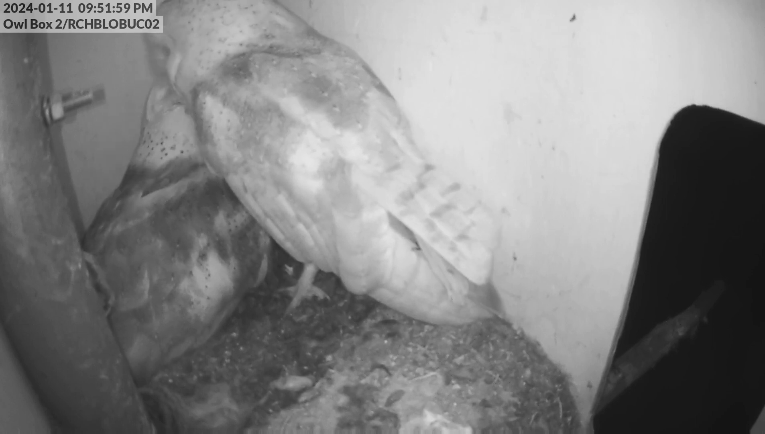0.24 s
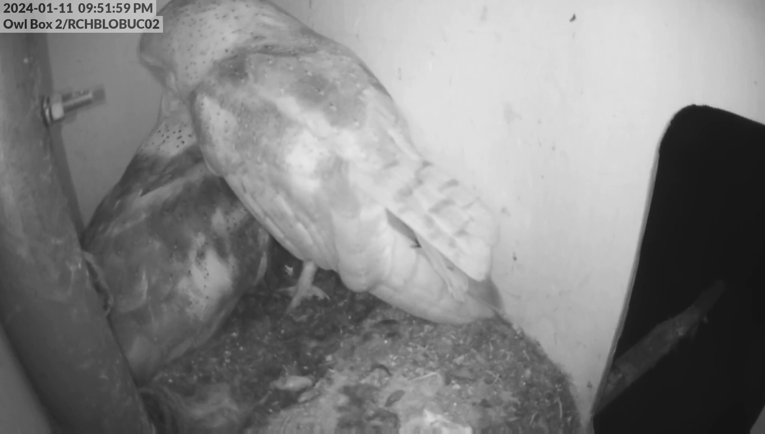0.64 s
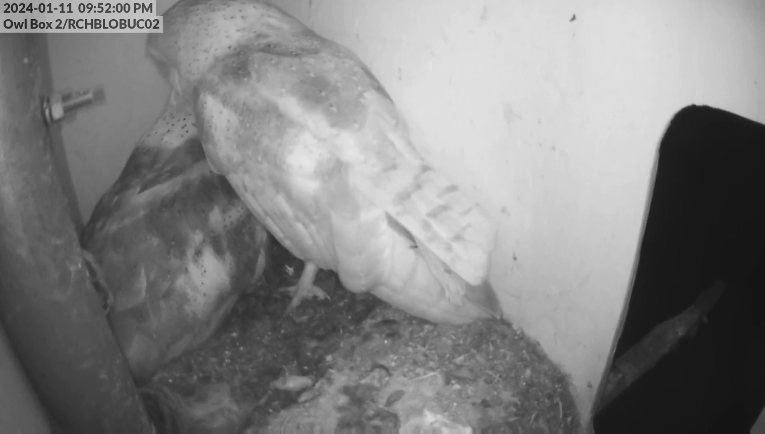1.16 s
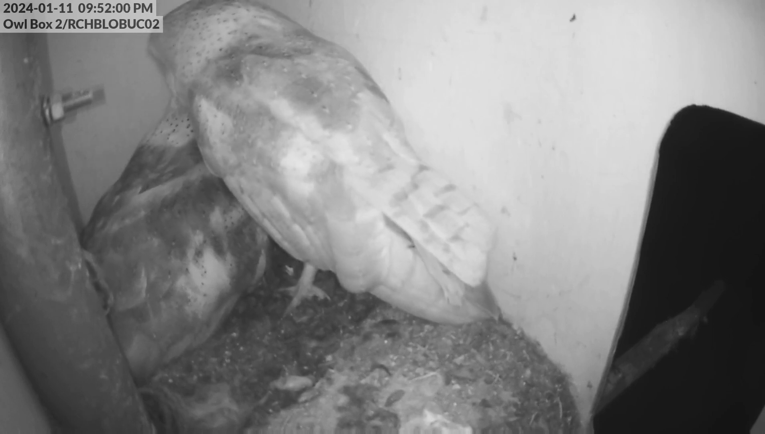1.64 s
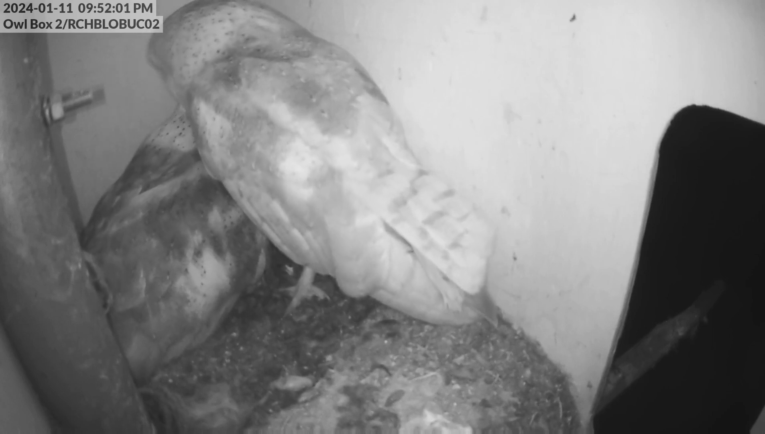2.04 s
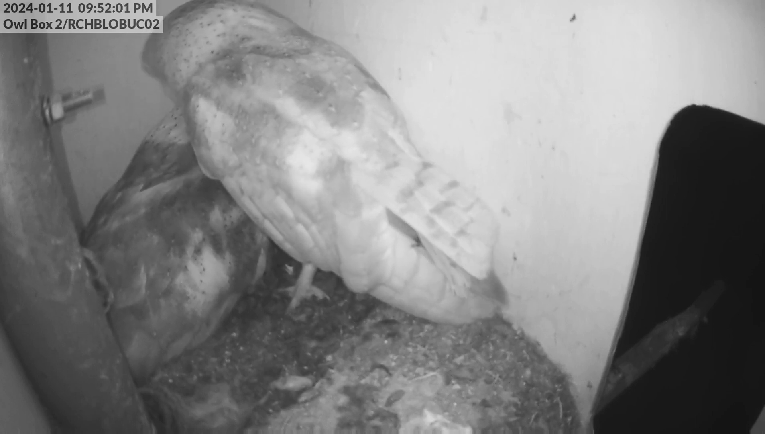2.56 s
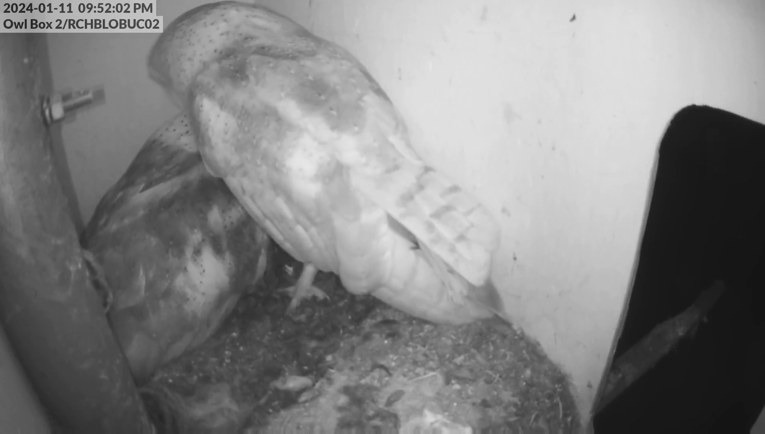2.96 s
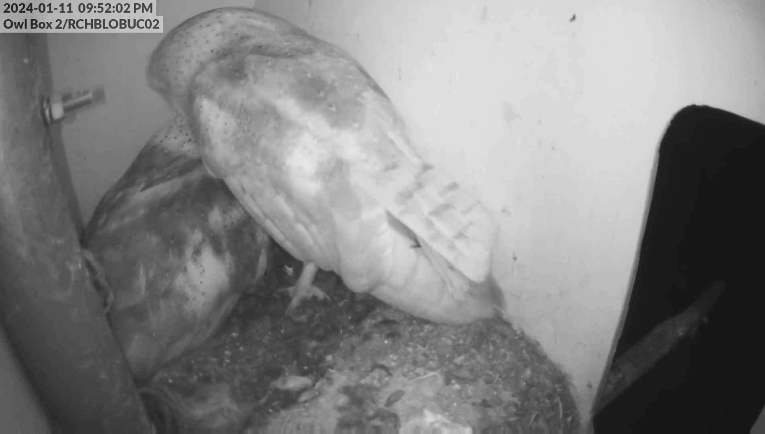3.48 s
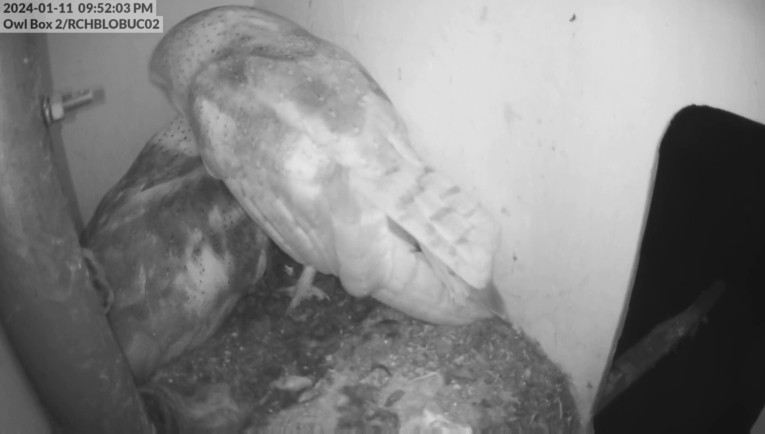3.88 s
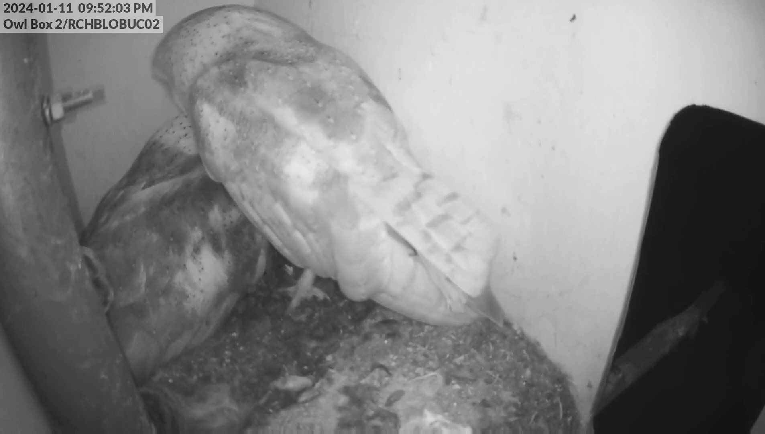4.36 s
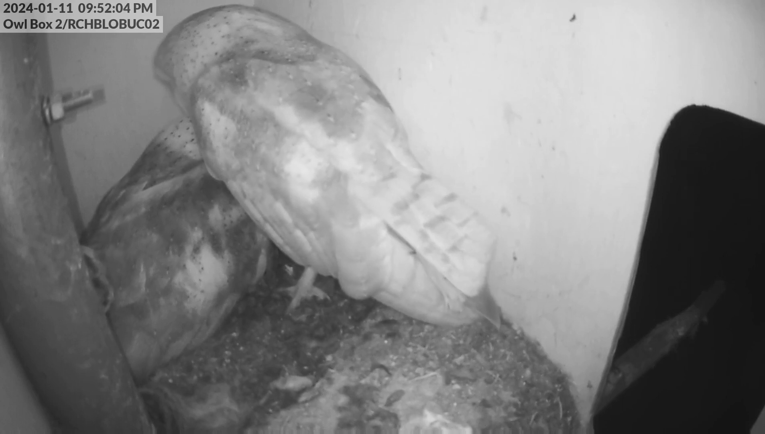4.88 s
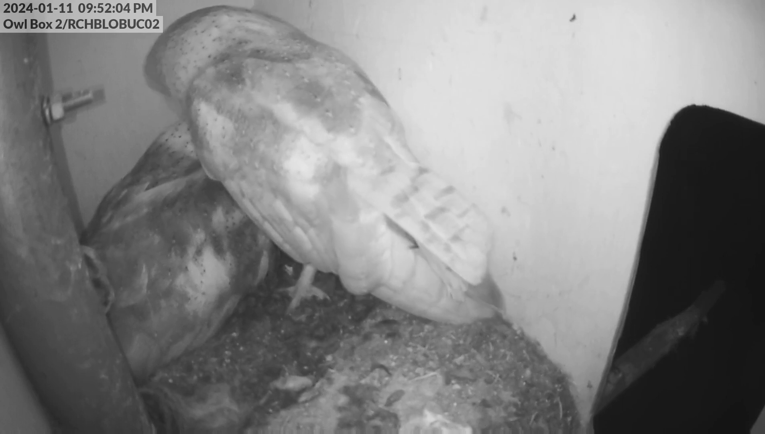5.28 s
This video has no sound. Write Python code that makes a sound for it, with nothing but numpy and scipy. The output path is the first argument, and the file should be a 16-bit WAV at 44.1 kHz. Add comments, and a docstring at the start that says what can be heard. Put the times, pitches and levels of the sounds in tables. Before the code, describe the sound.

Close to the microphone inside a small wooden nest box, a barn owl begs four times at uneven intervals. Each call lasts under half a second: a thin whistle breaks into a rough, rattling hiss and ends in a whistle. Soft dull ticks fall between the calls, and two faint hollow sounds ring far off after the third. A low steady hiss and drone continue throughout.

```python
"""A barn owl begs four times in a wooden nest box, close to the microphone.
Each call opens as a thin whistle, breaks into a rasping hiss with a rattle an octave below, and ends as a whistle.
The whistle is a complex tone roughened by chaos; rattle, low rasp and hiss are noise let through in puffs.
Around the calls: small ticks of noise in the box, two faint far-off sounds made of ringing noise,
and a steady low hiss over a low drone."""
import sys
import numpy as np
from scipy import signal
from scipy.fft import rfft, irfft, next_fast_len
from scipy.io import wavfile
from scipy.ndimage import uniform_filter1d, map_coordinates

SR = 44100
rng = np.random.default_rng(int(sys.argv[2]) if len(sys.argv) > 2 else 0)


def store_wav(level_fs):
    """Save 16-bit WAV to argv[1]."""
    pcm = np.round(np.clip(np.atleast_2d(level_fs), -1, 1) * 32767)
    wavfile.write(sys.argv[1], SR, pcm.T.astype(np.int16))


N = 243431
T = np.arange(N) / SR  # time of each sample, s


def amp(db):
    """Decibels to gain."""
    return 10 ** (np.asarray(db) / 20)


def unit(x):
    """x at rms 1."""
    return x / np.sqrt(np.mean(np.abs(x) ** 2) + 1e-20)


def steady(x, size=1100):
    """x at rms 1 all along, levelled over size samples so that its fast flutter is kept."""
    return x / np.sqrt(np.abs(uniform_filter1d(np.abs(x) ** 2, size)) + 1e-12)


def curves(rows):
    """One value per sample for each column after the time."""
    s, *cols = np.transpose(rows)
    return [np.interp(T, s, c) for c in cols]


def wobble(rate):
    """A smooth random curve, rate knots a second."""
    knots = rng.standard_normal(int(N * rate / SR) + 4)
    return map_coordinates(knots, [T * rate])


def filtered(x, response):
    """x times a response of frequency."""
    m = next_fast_len(N + SR // 2)
    return irfft(rfft(x, m) * response(np.fft.rfftfreq(m, 1 / SR)), m)[:N]


def coloured(x, points):
    """x through a (freq_hz, level_db) spectrum on a log frequency axis."""
    f, db = np.transpose(points)
    return filtered(x, lambda hz: amp(np.interp(np.log(hz + 1), np.log(f), db)))


def noise():
    """Fresh white noise."""
    return rng.standard_normal(N)


def gate(start, end, edge):
    """1 between two times, with soft edges."""
    return (1 + np.tanh((T - start) / edge)) * (1 + np.tanh((end - T) / edge)) / 4


# spectrum of the steady hiss: freq_hz, level_db (per Hz)
FLOOR = [(110, -50), (190, -14.5), (228, -4), (329, -4.5), (417, -2), (501, -4.5), (549, -1.5), (647, -3),
         (735, -3), (1100, -7.5), (1340, -15), (1900, -10.5), (2240, -18.5), (11600, -27.5), (15000, -86)]
# spectrum of the low drone: freq_hz, level_db (per Hz)
DRONE = [(20, -14), (40, -27), (75, -4), (100, -2.5), (125, 3.5), (160, -5.5), (200, -40), (300, -31.5)]


def background(floor_db=-53, drone_db=-61):
    """Coloured noise as a hiss whose level wavers slightly, over a low drone of darker noise."""
    floor = amp(floor_db + 1.23 * wobble(5.365)) * unit(coloured(noise(), FLOOR))
    drone = amp(drone_db) * unit(coloured(noise(), DRONE))
    return floor + drone


END_SAG_HZ, END_SAG_S = 165, 0.0147


def voicing(pitch, end):
    """Pitch and steadiness of one call; the pitch sags as the air runs out."""
    pitch_hz, steady_db = curves(pitch)
    sag_hz = END_SAG_HZ * np.exp(np.minimum(T - end, 0) / END_SAG_S)
    return pitch_hz - sag_hz, steady_db


# as a call settles in, the whistle and the hiss swell, the hiss dulls and the low rasp dies back
SETTLE_S, LOW_PEAK_S, LOW_BURST_S = 0.1, 0.037, 0.023
WHISTLE_START_DB, HISS_START_DB, LOW_BURST_DB = -2.5, -3.5, 7  # against the settled level
# top of the hiss against its lower half: start is added to settled, opening is dB per dB
BRIGHT_START_DB, BRIGHT_SETTLED_DB, BRIGHT_PER_OPENING = 8.5, -4.5, 1.6
# dB for each dB of effort
WHISTLE_PER_EFFORT, RATTLE_PER_EFFORT, LOW_PER_EFFORT, HISS_PER_EFFORT = 0.86, 1.46, 0.71, 1
# steady membranes whistle more and rattle less: dB for each dB
WHISTLE_PER_STEADINESS, RATTLE_PER_STEADINESS = 0.1, -0.085
RATTLE_PER_OPENING = -0.13  # an open beak trades rattle for hiss: dB for each dB


def drive(effort, steady_db, start):
    """dB that effort, beak opening, steadiness and settling give whistle, rattle, low rasp, hiss, brightness."""
    effort_db, opening_db = curves(effort)
    age = np.maximum(T - start, 0)
    fresh = np.exp(-age / SETTLE_S)
    low_burst = np.exp(-((age - LOW_PEAK_S) / LOW_BURST_S) ** 2)
    whistle_db = WHISTLE_PER_EFFORT * effort_db + WHISTLE_PER_STEADINESS * steady_db + WHISTLE_START_DB * fresh
    rattle_db = RATTLE_PER_EFFORT * effort_db + RATTLE_PER_STEADINESS * steady_db
    rattle_db = rattle_db + RATTLE_PER_OPENING * opening_db
    low_db = LOW_PER_EFFORT * effort_db + LOW_BURST_DB * low_burst
    hiss_db = HISS_PER_EFFORT * effort_db + opening_db + HISS_START_DB * fresh
    bright_db = BRIGHT_SETTLED_DB + BRIGHT_PER_OPENING * opening_db + BRIGHT_START_DB * fresh
    return whistle_db, rattle_db, low_db, hiss_db, bright_db


# the membranes lock in a strong swing, then the voice catches:
# swing_s, swing_peak_db, catch_length_s, whistle_dip_db
CATCHES = [(0.286, -16.5, 0.0043, -6), (0.34, -17, 0.0048, -22), (.356, -12.5, 0.0086, -11),
           (0.445, -16, 0.015, -6), (0.528, -14.5, .004, -6), (1.660, -22, 0.0046, -26),
           (1.737, -29, 0.0039, -23), (1.807, -24, 0.0042, -33), (1.921, -49, 0.011, -20),
           (2.961, -23, 0.016, -3.5), (3.052, -14, 0.013, -30), (3.107, -15, 0.008, -14),
           (4.792, -29, 0.0087, -17), (4.993, -30, 0.0075, -20)]
CATCH_LAG_S, CATCH_RASP_DB = 0.003, -18.5  # from the swing to the catch; dip of the rasp


def catches():
    """Gains of the whistle and of the rasp as the airflow briefly catches after each strong swing."""
    dips_db = np.zeros((2, N))
    for s, _, length, whistle_dip_db in CATCHES:
        from_middle = 2 * (T - s - CATCH_LAG_S) / length - 1
        dip_shape = np.exp(-from_middle ** 4)  # flat-bottomed
        dips_db += np.outer([whistle_dip_db, CATCH_RASP_DB], dip_shape)
    return amp(dips_db)


def puffs(rate, scatter_db, spiky_db):
    """Gain of uneven puffs of air let through by the flapping membranes."""
    return amp(scatter_db * wobble(rate) + spiky_db * wobble(1100))


def near_walls(x, strength=0.2, sway=0.00003, count=8):
    """Reflections within a few ms comb the hiss; the combs drift as the head moves."""
    delays = rng.uniform(0.00115, 0.0055, count)
    return x + sum(strength * np.interp(T - delay - sway * wobble(4), T, x) for delay in delays)


# spread of the rough whistle around its pitch: offset_hz, level_db
SKIRT = [(-750, -22.5), (-550, -21), (-330, -11.5), (-170, -1), (48, 3.5), (107, 5.5), (222, -11.5),
         (333, -31), (502, -16.5), (853, -41)]


def whistle(pitch_hz, rough, tone, strand_db, strand_hz=320, ceiling=2.4):
    """The syrinx tone as a complex wave: pure where rough is 0, chaotic and spread out where it is 1."""
    offset, db = np.transpose(SKIRT)
    m = next_fast_len(N)
    skirt = amp(np.interp(np.fft.fftfreq(m, 1 / SR), offset, db, left=-120, right=-120))
    spread = np.fft.ifft(np.fft.fft(noise(), m) * skirt)[:N]
    chaos = steady(spread, size=500) + tone
    chaos /= np.sqrt(1 + np.abs(chaos / ceiling) ** 2)  # the membranes can swing only so far
    # the other side of the syrinx sounds a little higher and beats against it
    strand_gain = amp(strand_db + 2.5 * wobble(150))
    strand_phase = 2 * np.pi * np.cumsum(strand_hz + 70 * wobble(250)) / SR
    strand = strand_gain * np.exp(1j * strand_phase)
    phase = 2 * np.pi * np.cumsum(pitch_hz + 20 * rough * wobble(200)) / SR
    swing = 1 - rough + rough * steady(chaos + 0.79 * strand)
    return np.sqrt(2) * swing * np.exp(1j * phase)


# overtones of the whistle: multiple, level_db (beside the hiss, before their strength is applied)
OVERTONES = [(2, -9.5), (3, -6), (4, -9.5), (5, -7.5)]


def overtones(wave):
    """Harmonics that follow every swing and glide of the whistle."""
    angle = np.angle(wave)
    return np.abs(wave) * sum(amp(level) * np.cos(round(k) * angle) for k, level in OVERTONES)


def gliding_gap(x, start, end, first_hz, last_hz, width_hz, depth_db):
    """The beak's cavity cuts a narrow gap that slides from one frequency to another between two times."""
    hz, t, z = signal.stft(x, SR, nperseg=512)
    centre_hz = np.interp(t, [start, end], [first_hz, last_hz])
    gain = amp(depth_db * np.exp(-((hz[:, None] - centre_hz) / width_hz) ** 2))
    return signal.istft(z * gain, SR, nperseg=512)[1][:N]


def tilted(x, bright_db, split_hz=6800):
    """A wider beak lifts the top of the hiss against its lower half."""
    dull = filtered(x, lambda hz: 1 / (1 + (hz / split_hz) ** 10))
    return dull * amp(-bright_db / 2) + (x - dull) * amp(bright_db / 2)


# one row a call: whistle_start_s, rasp_start_s, rasp_end_s, whistle_end_s, bill_shut_s
CALL_TIMES = [(.162, .176, .544, .561, .592), (1.56, 1.574, 1.922, 1.951, 1.969),
              (2.782, 2.792, 3.123, 3.136, 3.185), (4.718, 4.724, 5.124, 5.141, 5.178)]
# one row a call: whistle_db, rattle_db, low_rasp_db, hiss_db, second_voice_db (beside the whistle, before blending)
VOICES = [(-29, -30.5, -39, -35.5, -4), (-26.5, -27.5, -37.5, -37.5, -10), (-24.5, -28.5, -39, -36.5, -12),
          (-22, -28.5, -38, -36.5, -12)]
# one curve a call: time_s, pitch_hz (of the whistle), steadiness_db (of the membranes)
PITCH = [
    [(.17, 2020, 9), (.23, 2126, -11), (.305, 2015, 10.5), (.35, 2040, 1), (.385, 2057, 4),
     (.45, 2210, -23), (.535, 2080, -1)],
    [(1.564, 2125, 1), (1.61, 2264, -10), (1.67, 2164, 2.5), (1.73, 2136, 4), (1.88, 2130, 2),
     (1.944, 2194, -11)],
    [(2.785, 2215, 1.5), (2.87, 2114, 9.5), (2.945, 2032, -9), (2.976, 1850, -8), (2.99, 2132, 2),
     (3.06, 2084, -1), (3.125, 2177, -8)],
    [(4.721, 2148, -13), (4.75, 2070, -7), (4.82, 2051, -1.5), (4.95, 2003, 2.5), (5.03, 2073, -4),
     (5.09, 2063, 1.5), (5.135, 1982, 9)],
]
# one curve a call: time_s, effort_db, opening_db (of the beak, as level of hiss)
EFFORT = [
    [(.2, 1.5, -3), (.24, -4, -1.5), (.305, 2, -1), (.375, -1, -3), (.445, -1, -0.5), (.475, 1, 1.5),
     (.52, 3.5, 0.5), (.545, -.5, 1.5)],
    [(1.575, -2.5, 0), (1.6, 2, -1), (1.665, -2, 0), (1.735, 1, 3.5), (1.8, 2, -1), (1.85, 1.5, -1.5),
     (1.92, -0.5, -1)],
    [(2.8, -1.5, -4), (2.825, -1, 0.5), (2.86, -1, 0.5), (2.95, -.5, -1.5), (3.045, 1.5, -0.5),
     (3.075, 0, -1), (3.115, 1.5, 0)],
    [(4.735, 1, -0.5), (4.77, .5, 2.5), (4.81, .5, -3), (4.865, -1.5, -2), (4.945, 1, -0.5),
     (5.02, 1, -0.5), (5.122, -1, 1)],
]
# the rattle's resonance in each call: freq_hz, level_db (per Hz)
THROAT = [
    [(450, -38), (700, -29), (880, -7), (1030, -1.5), (1130, -9.5), (1240, -14.5), (1370, -61), (1700, -48)],
    [(450, -27.5), (700, -13.5), (850, -4), (960, -0.5), (1080, -1), (1210, -12.5), (1310, -38),
     (1700, -63)],
    [(450, -36), (700, -17.5), (860, -3), (980, 2), (1090, -4.5), (1190, -15), (1290, -28), (1700, -62)],
    [(450, -25.5), (700, -9.5), (820, -0.5), (960, 5), (1050, -2), (1130, -25), (1230, -34), (1700, -77)],
]
# spectrum of the low rasp: freq_hz, level_db (per Hz)
LOW_RASP = [(60, -38), (130, -27), (200, -5.5), (290, -3), (400, 1.5), (470, -2), (580, -6.5), (740, 3.5),
            (950, -20), (1300, -71)]
# the open beak's colour on the hiss of each call: freq_hz, level_db (per Hz)
BEAK = [
    [(1650, -37.5), (2350, -8), (2800, -1.5), (3250, 2), (3900, -13), (4300, -7.5), (4900, -10),
     (5250, 2.5), (5750, 3.5), (7050, -1), (7950, -7.5), (8750, 1.5), (11000, -12), (12200, -15),
     (15000, -50)],
    [(1650, -30), (2450, 0), (2800, 3), (3200, -2), (3600, -12.5), (4250, -0.5), (5100, -10.5), (5650, 1.5),
     (6000, -7), (6400, -1), (8400, -3), (10900, -3), (11800, -27), (13000, -13), (15000, -19)],
    [(1650, -35), (2450, -6), (3050, -3.5), (3700, -5.5), (4500, 0.5), (5150, -4), (5650, 3), (6650, -6.5),
     (7450, 5), (8000, -7), (8450, 2.5), (9400, -3.5), (11700, -15.5), (12800, -11), (15000, -46)],
    [(1650, -9), (2450, -5), (3050, 2), (3650, -8), (4100, 4), (4900, -1), (5550, -9), (6150, -1),
     (7300, -4.5), (8300, 2), (9500, -7.5), (10600, -4), (11700, -15), (12500, -8), (14000, -62)],
]
# gap in each call's hiss: start_hz, end_hz, width_hz, depth_db
BEAK_GAPS = [(3800, 5040, 230, -9), (5000, 5230, 180, -9), (5250, 5300, 140, -6), (5400, 5630, 130, -7)]
TONE = 0.6  # steady tone against chaos in the whistle, as a ratio at 0 dB of steadiness
ATTACK_S, RELEASE_S = 0.006, 0.016  # of the whistle
PURE_LIFT_DB = 3  # the whistle gains while no rasp draws on it
HISS_PER_CATCH = 0.37  # the hiss dips only as far as the whistle stops: dB for each dB
# strength of the overtones: always, added by the blowing, added while the voice catches
OVERTONE_BASE, OVERTONE_BLOWN, OVERTONE_CLEAR = 0.36, 0.37, 0.66


def owl(lowest_hz=130):
    """Four begging calls: rattle, low rasp and hiss ride on the same fluttering airflow around the whistle."""
    out = np.zeros(N)
    whistle_gain, rasp_gain = catches()
    flow = puffs(rate=330, scatter_db=0.5, spiky_db=4.6)
    air = near_walls(noise() * flow)
    bursts = amp(0.93 * wobble(190))  # the rattle comes and goes within a few cycles
    calls = zip(CALL_TIMES, VOICES, PITCH, EFFORT, THROAT, BEAK, BEAK_GAPS)
    for times, (*levels_db, strand_db), pitch, effort, throat, beak, gap in calls:
        start, rasp_on, rasp_off, end, _ = times
        pitch_hz, steady_db = voicing(pitch, end)
        *swells_db, bright_db = drive(effort, steady_db, rasp_on)
        whistle_db, rattle_db, low_db, hiss_db = (level + swell for level, swell in zip(levels_db, swells_db))

        rough = gate(rasp_on, rasp_off, edge=0.004) * rasp_gain
        blowing = gate(rasp_on, rasp_off, edge=0.007)
        envelope = np.clip((T - start) / ATTACK_S, 0, 1) * np.clip((end - T) / RELEASE_S, 0, 1)
        sounding = envelope * whistle_gain * amp(PURE_LIFT_DB * (1 - rough))
        wave = sounding * whistle(pitch_hz, rough, TONE * amp(steady_db), strand_db)

        throat_noise = steady(coloured(noise() * flow, throat), size=600)
        rattle = steady(throat_noise * bursts)
        low = steady(coloured(noise() * flow, LOW_RASP))
        hiss = blowing * whistle_gain ** HISS_PER_CATCH * steady(coloured(air, beak))
        edge = OVERTONE_BASE + blowing * (OVERTONE_BLOWN + OVERTONE_CLEAR * (1 - rasp_gain))
        harmonics = edge * coloured(overtones(wave), beak)  # they leave through the same beak as the hiss
        from_beak = tilted(gliding_gap(hiss + harmonics, start, end, *gap), bright_db)

        out += amp(whistle_db) * wave.real + amp(hiss_db) * from_beak
        out += rough * (amp(rattle_db) * rattle + amp(low_db) * low)
    return filtered(out, lambda hz: 1 - 1 / (1 + (hz / lowest_hz) ** 4))  # a small bird radiates no deep bass


def surges(swing_hz=1030, half=0.0029):
    """Before each catch the membranes lock for a few strong cycles about an octave below the whistle."""
    out = np.zeros(N)
    phases = rng.uniform(0, 2 * np.pi, len(CATCHES))
    for (s, swing_db, *_), phase in zip(CATCHES, phases):
        swell = np.exp(-((T - s) / half) ** 2)
        out += amp(swing_db) * swell * np.sin(2 * np.pi * swing_hz * T + phase)
    return out


# small ticks in the box: start_s, peak_db, treble_db (beside the body)
TICKS = [(.839, -58, 5), (1.547, -36.5, -28), (2.316, -44, -24), (2.397, -41.5, -11), (2.77, -43, -22),
         (3.489, -44, -8), (3.553, -41.5, -15), (3.681, -47.5, -3.5), (3.887, -42.5, -10)]
# spectrum of a tick's dull body: freq_hz, level_db (per Hz)
TICK_BODY = [(100, -48), (300, 17), (550, 11), (1000, 13), (1400, -31), (2000, 3), (3000, -36), (8000, -45)]
BILL_DB, BILL_TREBLE_DB = -41, -22  # the bill ticks as it shuts after a call
FAINT_TICK_DB, FAINT_TREBLE_DB = -50, -12  # fainter ones fall at random


def ticks(t60=0.013, count=4):
    """Soft, dull contacts, each with a little treble: the bill after each call, and small stirrings in the box."""
    body, edge = steady(coloured(noise(), TICK_BODY), size=200), noise()
    bill = [(shuts, BILL_DB, BILL_TREBLE_DB) for *_, shuts in CALL_TIMES]
    faint = [(s, FAINT_TICK_DB, FAINT_TREBLE_DB) for s in rng.uniform(0, N / SR, count)]
    out = np.zeros(N)
    for s, db, treble_db in [*bill, *TICKS, *faint]:
        envelope = amp(db - 60 * np.abs(T - s - 0.002) / t60) * (T > s)  # peaks 2 ms in
        out += envelope * (body + amp(treble_db) * edge)
    return out


def resonance(hz, centre, width):
    """A causal resonance with steep skirts."""
    return (1j * hz * width / (centre ** 2 - hz ** 2 + 1j * hz * width)) ** 2


# far-off sounds: start_s, rise_s, t60_s, level_db
FAR = [(3.465, 0.022, 1.2, -48), (3.79, 0.064, 1.1, -48.5)]
# what each far-off sound rings with: freq_hz, width_hz, level_db
FAR_MODES = [
    [(530, 41, 0.5), (968, 150, 0), (1126, 58, -7), (1433, 37, -11), (1560, 34, -6), (1790, 100, -6)],
    [(511, 36, 7.5), (625, 41, 7.5), (725, 130, 1), (1470, 290, -10), (1866, 200, -12)],
]


def far_sounds():
    """Two faint, hollow sounds from outside: noise through resonances, swelling and ringing away."""
    out = np.zeros(N)
    for (s, rise, t60, db), modes in zip(FAR, FAR_MODES):
        ring = filtered(noise(), lambda hz: sum(amp(level) * resonance(hz, c, w) for c, w, level in modes))
        decay = amp(db - 60 * np.maximum(T - s - rise - 0.05, 0) / t60)  # holds 50 ms after the rise
        out += decay * np.clip((T - s) / rise, 0, 1) * steady(ring, size=3000)
    return out


def notch(hz, centre, width, depth):
    """A causal dip that takes away depth (0-1) at its centre."""
    left = np.sqrt(np.clip(1 - depth, 0, 1))
    offset = centre ** 2 - hz ** 2
    return ((offset + 1j * hz * width * left) / (offset + 1j * hz * width)) ** 2


# bands that wall reflections cancel: freq_hz, width_hz, depth (0-1)
NOTCHES = [(1750, 46, 0.82), (2297, 50, 1), (2880, 63, 0.73), (5460, 70, 0.6)]


def box(x, t60=0.12, wet_db=-22):
    """The wooden walls cancel a few bands and answer with a brief decaying tail."""
    t = np.arange(SR // 8) / SR
    tail = rng.standard_normal(len(t)) * amp(-60 * t / t60) * (t > 0.002)
    x = filtered(x, lambda hz: np.prod([notch(hz, *row) for row in NOTCHES], axis=0))
    return x + amp(wet_db) * signal.fftconvolve(x, tail / np.linalg.norm(tail))[:N]


def scene():
    """The owl and ticks inside the box, the far-off sounds and the background, at one microphone."""
    in_box = box(owl() + surges() + ticks())
    return (in_box + far_sounds() + background())[None]


def record(dry, top_hz=15300):
    """The microphone's chain keeps nothing above its band limit."""
    return filtered(dry[0], lambda hz: hz < top_hz)[None]


dry = scene()
out = record(dry)
store_wav(out)
```